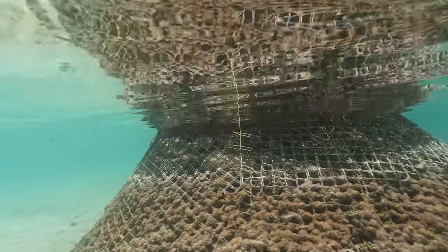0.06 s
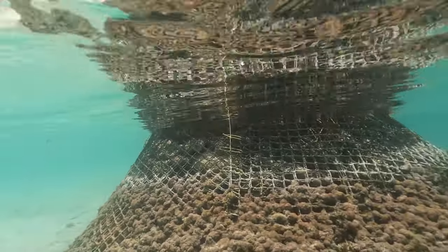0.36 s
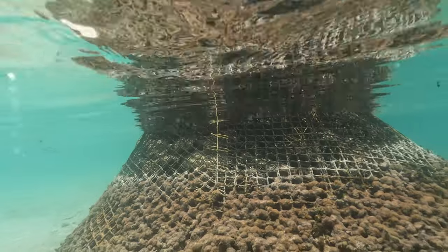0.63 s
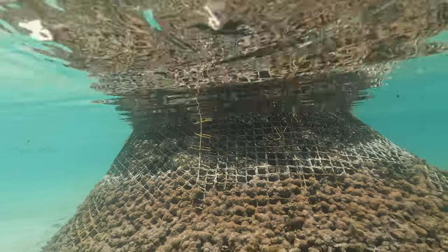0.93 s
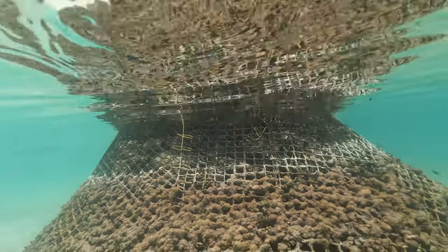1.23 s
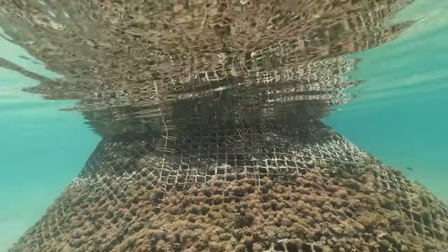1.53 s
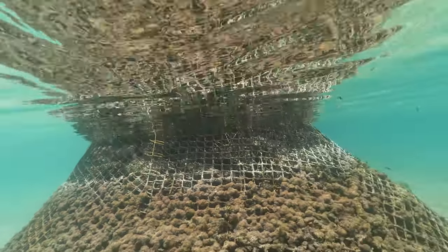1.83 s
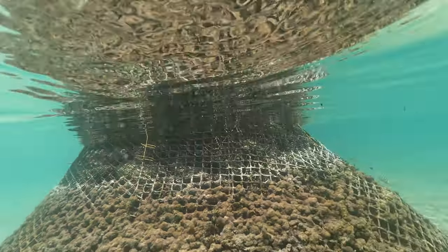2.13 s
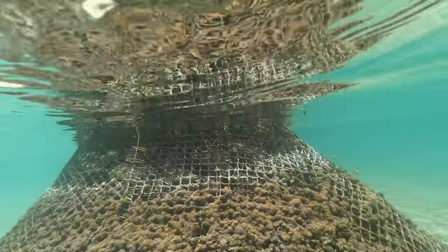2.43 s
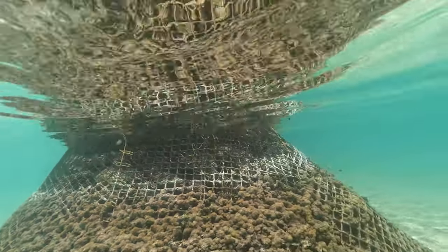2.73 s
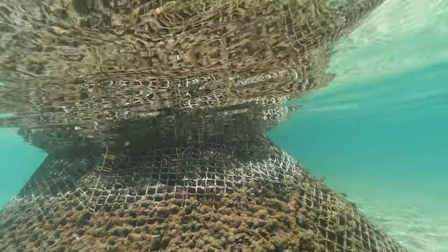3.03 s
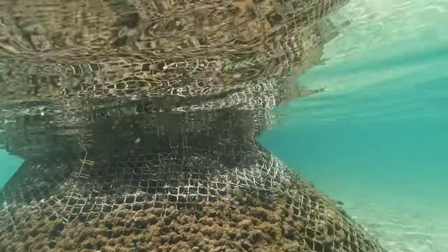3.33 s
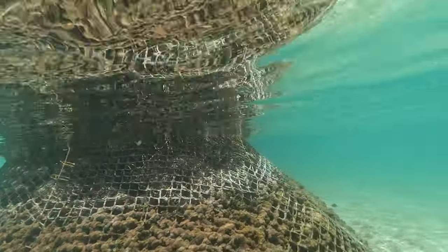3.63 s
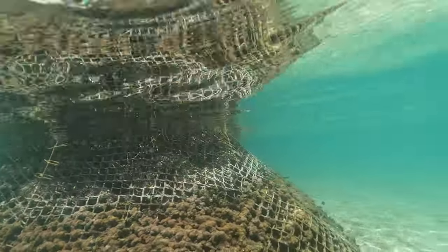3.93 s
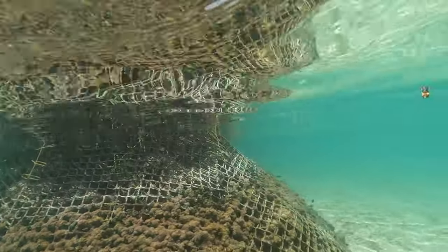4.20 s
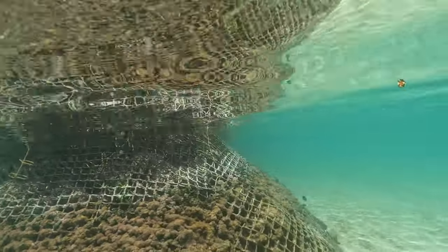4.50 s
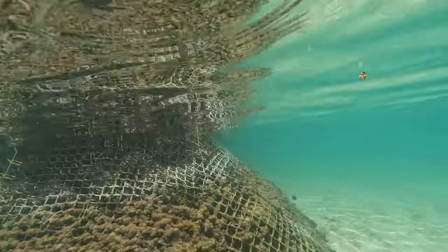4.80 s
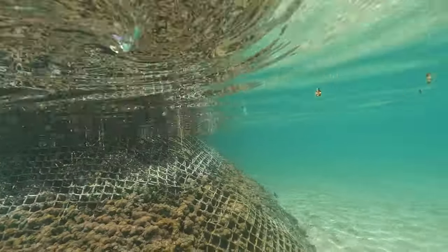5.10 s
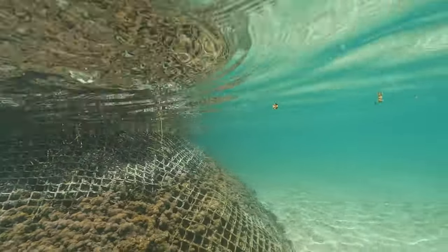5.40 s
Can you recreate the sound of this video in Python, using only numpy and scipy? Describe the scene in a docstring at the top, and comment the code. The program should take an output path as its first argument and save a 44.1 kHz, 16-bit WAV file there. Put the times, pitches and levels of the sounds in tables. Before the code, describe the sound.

Heard from a camera drifting underwater in its waterproof housing, ripples glug and slosh, close and muffled, above a slow rumble of moving water. A fine, steady crackle of shrimp and bubbles surrounds them, dotted with sharp clicks, plops and brief fizzy swishes. The gulps thin out, then come thicker after a hollow knock on the housing midway. A sharp double snap and a short low swell follow near the end.

```python
"""Just under the sea surface, beside a netted, overgrown float: a camera drifts in a waterproof housing
with two microphone ports. Close by, wavelets slap and make trapped air gulp near 120 Hz, and bubbles ring
as they pinch off. Near snaps and a few hollow knocks ring the housing itself. Behind them lie a slow
pressure rumble and, all round, the crackle of small bubbles and distant shrimp."""
import sys
import numpy as np
from scipy import signal
from scipy.fft import rfft, irfft
from scipy.io import wavfile
from scipy.ndimage import uniform_filter1d

SR = 44100
rng = np.random.default_rng(int(sys.argv[2]) if len(sys.argv) > 2 else 0)


def master_out(mix):
    """Clip the mix to full scale and print it as 16-bit PCM to the path in sys.argv[1]."""
    frames = np.transpose(np.atleast_2d(mix))
    ceiling = np.clip(frames, -1, 1)
    pcm = np.round(ceiling * 32767).astype(np.int16)
    wavfile.write(sys.argv[1], SR, pcm)


N = 249297
TIME = np.arange(N) / SR


# Wavelets close to the housing. Each row: start in seconds, air ring and splash in relative dB.
WAVELETS = [(0.322, -24.5, -36.5), (0.338, -26, -35.5), (0.384, -25.5, -37.5), (0.415, -24, -39.5),
            (0.464, -24, -41.5), (0.5, -21.5, -58.5), (0.594, -25.5, -44.5), (0.753, -22.5, -51),
            (0.913, -41, -50.5), (1.108, -29.5, -54), (1.225, -31.0, -49.5), (1.324, -21, -41.5),
            (1.375, -25, -50), (1.513, -21.5, -39), (1.999, -36.5, -48), (2.143, -27, -45.5),
            (2.245, -23.5, -54.5), (2.336, -34, -58.5), (2.694, -23.5, -36.5), (2.753, -23.5, -39),
            (3.213, -24.0, -56), (3.272, -20, -58), (3.297, -15, -46), (3.395, -22, -38.5),
            (3.448, -17.5, -55), (3.618, -24.5, -51), (3.653, -24, -40.5), (3.795, -26.0, -54.5),
            (3.88, -34, -44), (3.99, -23.5, -43.5), (4.059, -21, -40.5), (4.088, -20, -44.5),
            (4.194, -22.5, -51), (4.225, -18.0, -40.5), (4.334, -20, -45), (4.654, -26, -58),
            (4.688, -18.5, -41.5), (4.747, -21.5, -41), (4.811, -21.0, -38.5), (4.966, -25, -50.5),
            (5.018, -28.5, -42.5), (5.097, -21.5, -45.5), (5.15, -16.0, -44.5), (5.235, -21.5, -59.5),
            (5.279, -19, -49), (5.407, -24.0, -43), (5.47, -35, -42.5), (5.52, -23, -41.5),
            (5.587, -11.5, -42.5)]
def gulps(pocket_hz=125.35, start_hz=107, pace_hz_per_db=1.0, settle_s=0.015,
          rise_s=0.004, ring_t60=0.25, choke_t60=0.041, upper_ratio=1.265, upper_db=-14):
    """Each wavelet sets the trapped air swinging and chokes the swing before it."""
    out, t = np.zeros((2, N)), TIME[:SR // 3]
    starts, ring_db, splash_db = np.transpose(WAVELETS)
    gaps = np.diff(starts, append=N / SR)
    # A wavelet forces its own pace, faster the splashier it is; then the air settles on its natural pitch.
    splashiness = splash_db - ring_db
    paces = start_hz + pace_hz_per_db * (splashiness - splashiness.mean())
    for s, db, hz, gap in zip(starts, ring_db, paces, gaps):
        phase = 2 * np.pi * (pocket_hz * t + (hz - pocket_hz) * settle_s * rise(t, settle_s))
        swing = np.sin(phase) + undb(upper_db) * np.sin(upper_ratio * phase)
        choke = fade(np.maximum(t - gap, 0), choke_t60)
        envelope = rise(t, rise_s) * fade(t, ring_t60) * choke
        add(out, s, -undb(db) * swing * envelope)
    return out


# Spectra of a splash, churning water and pressure swell. Each row: frequency in Hz, relative level in dB.
SPLASH_SPECTRUM = [(120, -14.5), (190, 8), (240, 1.5), (290, -4.5), (345, 8.5), (400, -3), (450, 1.5),
                   (490, -1.5), (536, -3.5), (620, -5.5), (750, -16.5), (950, -32.5), (1600, -30),
                   (3000, -28.5)]
CHURN_SPECTRUM = [(35, -41), (55, 3.5), (78, 5.5), (100, -10), (122, -3.5), (145, 3), (165, -9), (200, -11),
                  (250, -19), (300, -43.5), (420, -27), (580, -22.5), (800, -52.5), (1400, -69.5)]
SWELL_SPECTRUM = [(4, 5), (12, 2), (22, -7.5), (32, 0.5), (46, -3.5), (65, -5), (100, -12), (200, -30.5),
                  (400, -40)]
def splashes(splash_db=1.0, splash_t60=0.17, slap_db=3, slap_t60=0.013,
             eddy_db=-9, eddy_t60=0.094, shove_db=-21, shove_t60=0.38):
    """Each wavelet also throws a short, dull splash, stirs eddies and shoves the housing."""
    sprays, eddies, shoves = np.zeros((3, 2, N))
    t = TIME[:SR // 3]
    burst = rise(t, rise_s=0.0028) * (fade(t, splash_t60) + undb(slap_db) * fade(t, slap_t60))
    push = rise(t, rise_s=0.0044)
    for s, db, wet_db in WAVELETS:
        add(sprays, s, undb(wet_db + splash_db) * burst * port_noise(len(t), side_db=-7.5))
        add(eddies, s, undb(db + eddy_db) * push * fade(t, eddy_t60) * port_noise(len(t), side_db=-15.5))
        add(shoves, s, undb(db + shove_db) * push * fade(t, shove_t60) * port_noise(len(t), side_db=-22))
    return colour(sprays, SPLASH_SPECTRUM) + colour(eddies, CHURN_SPECTRUM) + colour(shoves, SWELL_SPECTRUM)


# Hollow knocks right on the housing. Each row: start in seconds, ring and thud in relative dB.
HOUSING_KNOCKS = [(0.0139, -18, -34.5), (0.468, -54, -39.5), (0.641, -37, -36.5), (1.546, -35, -34),
                  (2.935, -52, -38.5), (3.099, -14, -31.5), (4.454, -32, -36), (4.4663, -33, -22),
                  (4.752, -56, -35)]
# The housing's low modes. Each row: frequency in Hz, relative level in dB, t60 in seconds.
HOUSING_MODES = [(502.4, 2.5, 0.035), (463, -24, 0.059), (374.4, -21.5, 0.15), (537.3, -7, 0.084),
                 (736, -19.5, 0.095), (812, -28, 0.097)]
# Spectrum of the thud. Each row: frequency in Hz, relative level in dB.
THUD_SPECTRUM = [(110, 11.5), (200, -17), (350, -4.5), (500, -2.5), (780, -8), (950, -20.5), (1500, -16),
                 (2400, -21.5)]
def knocks(level_db=5, rise_s=0.0031, right_db=-4.5, right_lag_s=0.00017, thud_t60=0.076):
    """Blows near the left port ring the low modes of the housing and add a rough thud."""
    t = TIME[:SR // 5]
    rings, thuds = np.zeros((2, 2, N))
    ages = np.maximum(np.array([t, t - right_lag_s]), 0)
    port_gains = np.array([[1], [undb(right_db)]])
    ring = ringing(HOUSING_MODES, ages) * rise(ages, rise_s) * port_gains
    for s, ring_db, thud_db in HOUSING_KNOCKS:
        add(rings, s, undb(ring_db + level_db) * ring)
        add(thuds, s, undb(thud_db) * rattle(t, thud_t60) * port_noise(len(t), side_db=-9.5))
    return rings + colour(thuds, THUD_SPECTRUM)


# The loudest snaps, close by. Each row: start in seconds, then crack, clack and sizzle in relative dB.
CLOSE_SNAPS = [(0.0094, -41.5, -42.5, -70), (0.1485, -37.5, -69, -56), (0.4162, -45, -71, -66),
               (1.202, -43, -59, -80), (1.2935, -50, -66, -63), (1.547, -42, -25, -82),
               (1.6876, -42, -71, -68), (1.847, -40, -58, -69), (2.3489, -44.5, -48, -64),
               (2.604, -41, -69, -68), (2.8984, -42.5, -66, -76), (2.9357, -39.5, -44, -80),
               (3.0834, -41.5, -51, -61), (3.0935, -41.5, -29, -77), (3.289, -39.5, -76, -56),
               (3.901, -45, -72, -68), (4.0574, -40.5, -72, -77), (4.104, -40, -57, -61),
               (4.247, -47.5, -78, -63), (4.435, -39.5, -51, -61), (4.454, -27, -36, -41),
               (4.4651, -26.5, -35, -46), (4.92, -41.5, -53.5, -68), (5.254, -36.5, -47, -68),
               (5.3116, -44, -54, -80)]
# Modes of the housing wall. Each row: frequency in Hz, relative level in dB, t60 in seconds.
WALL_MODES = [(1465, -6.5, 0.083), (1490, -7, 0.037), (1795, -5, 0.098), (2150, -9, 0.16),
              (2435, -4, 0.077)]
# Spectra of the bright crack, mid clack and top sizzle. Each row: frequency in Hz, relative level in dB.
CRACK_SPECTRUM = [(2200, -8), (3300, -10.5), (4000, -4), (4700, 2.5), (5500, -3), (6100, -10), (7000, -6),
                  (8000, -21), (10000, -33)]
CLACK_SPECTRUM = [(500, -16), (900, -22.5), (1250, -15.5), (1550, -5.5), (2000, 2), (2400, -6),
                  (2800, -13.5), (4000, -21)]
SIZZLE_SPECTRUM = [(7000, -25), (8500, -4.5), (10500, -11), (12000, -0.5), (13200, -16), (15000, -22),
                   (16000, -37)]
def close_snaps(crack_db=5.5, clack_db=3, ring_db=-7, sizzle_db=4, sizzle_t60=0.011, rattle_t60=0.016):
    """Close snaps rattle the housing and leave its wall ringing; the top dies first."""
    t = TIME[:SR // 8]
    cracks, clacks, sizzles, rings = np.zeros((4, 2, N))
    wall, envelope = ringing(WALL_MODES, t), rattle(t, rattle_t60)
    for s, crack, clack, sizzle in CLOSE_SNAPS:
        add(cracks, s, undb(crack + crack_db) * envelope * port_noise(len(t), side_db=-15))
        add(clacks, s, undb(clack + clack_db) * envelope * port_noise(len(t), side_db=-1.5))
        add(rings, s, undb(clack + ring_db) * wall * pan(left_db=-5.0))
        add(sizzles, s, undb(sizzle + sizzle_db) * fade(t, sizzle_t60) * port_noise(len(t), side_db=-6))
    body = colour(cracks, CRACK_SPECTRUM) + colour(clacks, CLACK_SPECTRUM)
    return body + colour(sizzles, SIZZLE_SPECTRUM) + rings


# The loudest bubbles pinching off, from low plops to high pings, to the left.
# Each row: start in seconds, relative level in dB, starting pitch in Hz, t60 in seconds.
LOUD_BUBBLES = [(0.013, -48.5, 1627, 0.19), (0.338, -35.5, 600, 0.017), (0.384, -38, 340, 0.11),
                (0.417, -39, 216, 0.1), (0.596, -41.5, 346, 0.11), (0.642, -51, 1590, 0.1),
                (1.203, -53.5, 506, 0.5), (1.324, -39, 507, 0.033), (1.999, -36, 569, 0.046),
                (2.349, -29.5, 2320, 0.013), (2.696, -36.5, 358, 0.13), (2.725, -33.5, 215, 0.077),
                (2.898, -30, 4800, 0.03), (4.026, -35, 495, 0.034), (4.058, -33, 4700, 0.051),
                (4.469, -26.5, 2400, 0.025), (4.687, -29, 402, 0.031), (4.745, -28.5, 415, 0.047),
                (5.148, -39, 490, 0.045), (5.31, -27.5, 4350, 0.015), (5.409, -27.5, 299, 0.036),
                (5.473, -32.5, 512, 0.058)]
def bubbles(level_db=1, rise_s=0.0012, glide_per_s=0.24, freed_db=-3, freed_hz=(310, 600), freed_t60=0.05):
    """A bubble rings at the pitch of its size, sharpening slightly as it rises; every splash frees one."""
    t, out = TIME[:SR // 8], np.zeros((2, N))
    freed = [(s, wet_db + freed_db, rng.uniform(*freed_hz), freed_t60) for s, _, wet_db in WAVELETS]
    for s, db, hz, t60 in list(LOUD_BUBBLES) + freed:
        ring = np.sin(2 * np.pi * hz * (t + glide_per_s * t ** 2 / 2))
        add(out, s, undb(db + level_db) * ring * rise(t, rise_s) * fade(t, t60))
    return out * pan(left_db=5.0)


# Spurts of bubbles. Each row: middle in seconds, relative level in dB, pitch in Hz,
# half-length in seconds, bandwidth relative to the pitch.
BUBBLE_SPURTS = [(0.923, -49.5, 4250, 0.051, 0.12), (1.482, -47.5, 4600, 0.056, 0.49),
                 (1.528, -50.5, 2050, 0.075, 0.42), (1.82, -56.5, 2230, 0.039, 0.25),
                 (2.192, -49.5, 4600, 0.054, .35), (2.803, -61.5, 1270, 0.078, 0.15),
                 (3.38, -53.5, 2200, 0.061, 0.47), (3.41, -56.5, 936, 0.065, 0.037),
                 (5.623, -57, 6600, 0.043, 0.11)]
def spurts(edge_db=-14):
    """A breaking ripple sheds many bubbles of about one size: a brief swish."""
    out = np.zeros((2, N))
    for s, db, hz, half_length, width in BUBBLE_SPURTS:
        band = [(hz / (1 + width), edge_db), (hz, 0), (hz * (1 + width), edge_db)]
        envelope = np.exp(-((TIME - s) / half_length) ** 2)
        out += undb(db) * envelope * colour(port_noise(N, side_db=-16.0), band)
    return out


# The slow pressure swell on the housing. Each row: time in seconds, relative level in dB.
SWELL_LEVELS = [(0.0, -34.5), (0.2, -35.5), (0.55, -32), (1.0, -39.5), (1.3, -38), (1.85, -43.5),
                (1.95, -34), (2.08, -42.5), (2.25, -32.5), (2.55, -40.5), (2.75, -35), (3.0, -44.5),
                (3.3, -37.5), (4.62, -37), (4.77, -20.5), (4.95, -38), (5.35, -33.5), (5.6, -26)]
def flow(swell_db=-1, murmur_db=-17, hum_db=-15, hum_hz=123, hum_t60=0.24):
    """Pressure swings slowly; the moving water murmurs along and keeps the trapped air faintly ringing."""
    swell, = gains(SWELL_LEVELS)
    heave = colour(port_noise(N, side_db=-21), SWELL_SPECTRUM)
    murmur = colour(port_noise(N, side_db=-20), CHURN_SPECTRUM)
    pocket = ringing([(hum_hz, 0, hum_t60)], TIME[:SR // 3])
    hum = unit(signal.fftconvolve(rng.standard_normal(N), pocket)[:N])
    return swell * (undb(swell_db) * heave + undb(murmur_db) * murmur + undb(hum_db) * hum)


# The steady crackle all round. Each row: time in seconds, fine fizz and medium bubbles in relative dB.
CRACKLE_LEVELS = [(0.0, -57.5, -65), (0.33, -52, -61), (0.52, -56.5, -65), (1.2, -57.5, -65),
                  (1.68, -54, -62), (2.03, -53.5, -58.5), (2.26, -58, -63.5), (2.61, -55.5, -57),
                  (2.85, -56.5, -65), (3.24, -55, -60), (3.81, -58.5, -66), (4.81, -56.5, -60),
                  (5.25, -58, -65.5), (5.65, -55, -67)]
# Spectra of the fine, medium and coarse pops. Each row: frequency in Hz, relative level in dB.
FIZZ_SPECTRUM = [(1710, -76), (2900, -14), (3540, -11.5), (3950, 5), (4390, 5), (5030, 1.5), (5490, 2.5),
                 (6060, -5), (6560, -2.5), (7200, -4.5), (7570, -6), (8250, -18.5), (10300, -26),
                 (12000, -20.5), (12700, -27.5), (16500, -96), (22000, -120)]
MEDIUM_SPECTRUM = [(820, -32.5), (1400, -37), (1650, 4.5), (1960, -1), (2200, 4), (2760, 1), (2930, -3.5),
                   (3400, -0.5), (4420, -43), (7480, -120)]
WASH_SPECTRUM = [(600, 3.5), (800, -16), (960, -6.5), (1130, -7.5), (1300, -4.5), (1600, -4.5), (1850, -13),
                 (2300, -19)]
def crackle(fizz_db=0.3, medium_db=0.86, calm_db=-69, wave_db=-56,
            wave_start_s=2.48, wave_rise_s=0.35, wave_hold_s=0.5, wave_fall_s=0.61):
    """Countless tiny pops in three sizes; the coarse ones swell as one wave washes through the net."""
    fizz_gain, medium_gain = gains(CRACKLE_LEVELS)
    corners = np.cumsum([wave_start_s, wave_rise_s, wave_hold_s, wave_fall_s])
    wash_gain = undb(np.interp(TIME, corners, [calm_db, wave_db, wave_db, calm_db]))
    fizz = colour(fizz_gain * pops(per_s=9000, spread_db=1.6, side_db=-18.5), FIZZ_SPECTRUM)
    medium = colour(medium_gain * pops(per_s=4000, spread_db=1.6, side_db=-5.5), MEDIUM_SPECTRUM)
    wash = colour(wash_gain * pops(per_s=3000, spread_db=1.3, side_db=0.0), WASH_SPECTRUM)
    return undb(fizz_db) * fizz + undb(medium_db) * medium + wash


def far_shrimp(count=110, nearest_db=-39, range_ratio=6):
    """Shrimp snap at random moments all over the bottom; most are far, and level falls with distance."""
    t, out = TIME[:SR // 16], np.zeros((2, N))
    for when, place in rng.random((count, 2)):
        distance = 1 + (range_ratio - 1) * place
        burst = rattle(t, t60=0.016) * port_noise(len(t), side_db=-11.5)
        add(out, when * N / SR, undb(nearest_db) / distance * burst)
    return colour(out, FIZZ_SPECTRUM)


# Balance of the microphone ports. Each row: frequency in Hz, left minus right in dB.
PORT_BALANCE = [(60, -8), (110, 9), (200, -5), (350, -8), (640, 0.5), (1150, -5), (2080, 3), (3760, -5.5),
                (6800, 0), (12300, 5.5)]
def ports(x):
    """The two microphone ports favour different pitches."""
    lean_db = on_log_axis(PORT_BALANCE, np.fft.rfftfreq(N, 1 / SR))
    return irfft(rfft(x) * undb(np.array([lean_db, -lean_db]) / 2), N)


def port_noise(size, side_db):
    """White noise at the two ports: a shared part, plus a side part of opposite sign in each."""
    mid, side = rng.standard_normal((2, size))
    return mid + undb(side_db) * np.array([side, -side])


def pops(per_s, spread_db, side_db, flicker_db=1.7):
    """Random pops in loose clusters, a few far stronger than the rest."""
    fires = rng.random(N) < per_s / SR
    strength = np.minimum(rng.exponential(size=N), 6)
    clusters = unit(uniform_filter1d(rng.standard_normal(N), size=SR // 40))
    return unit(port_noise(N, side_db) * fires * undb(spread_db * strength + flicker_db * clusters))


def rattle(t, t60, rise_s=0.00092, tail_db=-18, tail_t60=0.1):
    """Envelope of a brief rattle of the housing; scatter from the surface trails it."""
    return rise(t, rise_s) * (fade(t, t60) + undb(tail_db) * fade(t, tail_t60))


def ringing(modes, t):
    """Sum of decaying modes (Hz, dB, t60) at ages t."""
    return sum(undb(db) * np.sin(2 * np.pi * hz * t) * fade(t, t60) for hz, db, t60 in modes)


def colour(x, points, size=8192, skirt_db_per_octave=36):
    """Causal filter with the given spectrum and unit power gain; it falls steeply outside the points."""
    hz = np.maximum(np.arange(size // 2 + 1) * SR / size, 1)
    octaves_outside = np.abs(np.log2(hz / np.clip(hz, points[0][0], points[-1][0])))
    db = np.maximum(on_log_axis(points, hz) - skirt_db_per_octave * octaves_outside, -100)
    # Folding the cepstrum gives minimum phase, so nothing rings ahead of a hit.
    cepstrum = irfft(np.log(undb(db)))
    cepstrum[1:size // 2] *= 2
    cepstrum[size // 2 + 1:] = 0
    response = irfft(np.exp(rfft(cepstrum)))
    return signal.fftconvolve(x, response[None] / np.linalg.norm(response))[:, :N]


def on_log_axis(points, hz):
    """Join (Hz, value) points by straight lines over log frequency."""
    f, value = np.transpose(points)
    return np.interp(np.log(np.maximum(hz, 1)), np.log(f), value)


def gains(table):
    """Each dB column of a level curve as a gain per sample."""
    s, *columns = np.transpose(table)
    return [undb(np.interp(TIME, s, db)) for db in columns]


def rise(t, rise_s):
    """Exponential approach from 0 to 1."""
    return 1 - np.exp(-t / rise_s)


def fade(t, t60):
    """Exponential decay, 60 dB down after t60 seconds."""
    return np.exp(-np.log(1000) * t / t60)


def pan(left_db):
    """Left and right gains for a level difference."""
    return undb(np.array([[left_db], [-left_db]]) / 2)


def undb(db):
    """Decibels to gain."""
    return 10 ** (np.asarray(db) / 20)


def unit(x):
    """Scale to rms 1."""
    return x / np.sqrt(np.mean(x ** 2))


def add(out, s, sound):
    """Mix a sound in at s seconds."""
    start = int(np.clip(s * SR, 0, N - 1))
    out[:, start:start + sound.shape[-1]] += sound[..., :N - start]


def scene():
    """Everything that reaches the housing through the water."""
    body = gulps() + splashes() + flow() + bubbles() + knocks()
    sparkle = crackle() + spurts() + close_snaps() + far_shrimp()
    return body + ports(sparkle)


def record(dry):
    """The camera cuts the top above 15 kHz."""
    return signal.sosfilt(signal.ellip(8, .2, 70, 15000, fs=SR, output="sos"), dry)


dry = scene()
out = record(dry)
master_out(out)
```